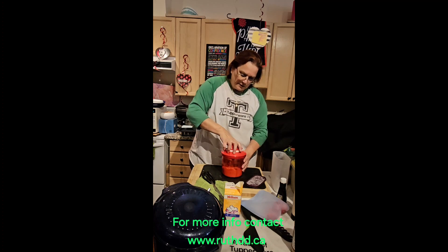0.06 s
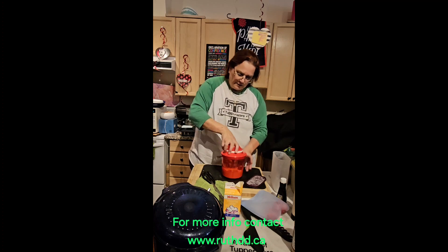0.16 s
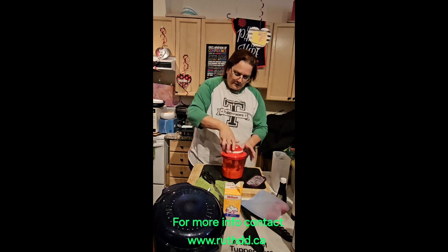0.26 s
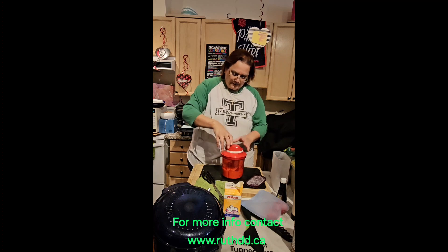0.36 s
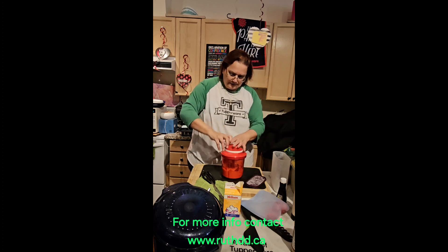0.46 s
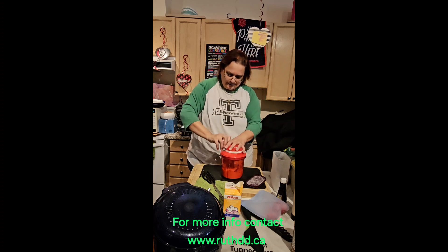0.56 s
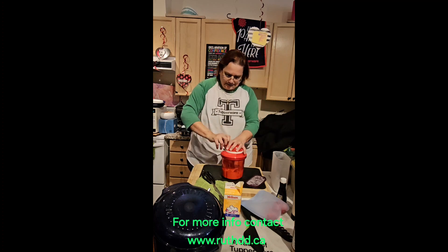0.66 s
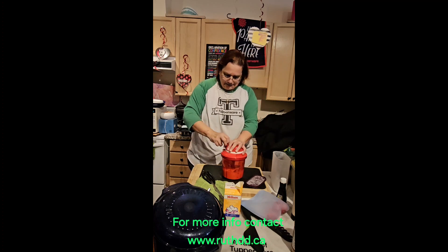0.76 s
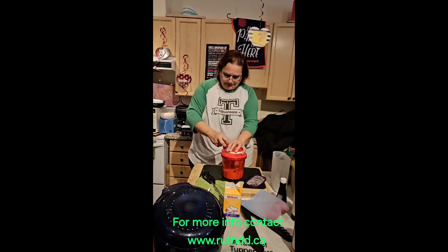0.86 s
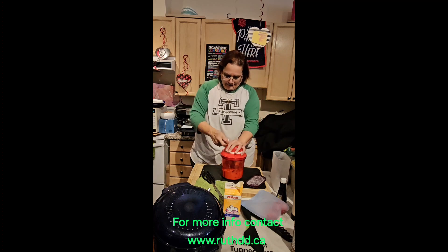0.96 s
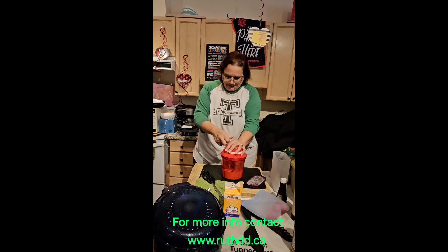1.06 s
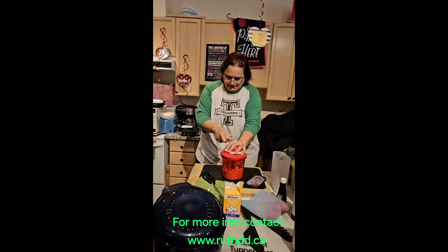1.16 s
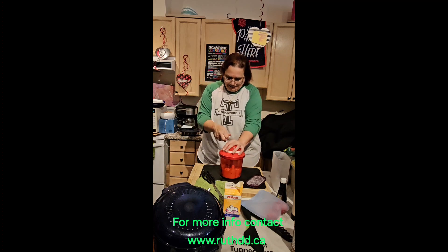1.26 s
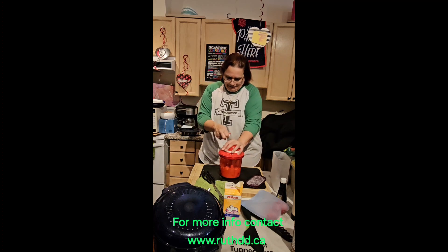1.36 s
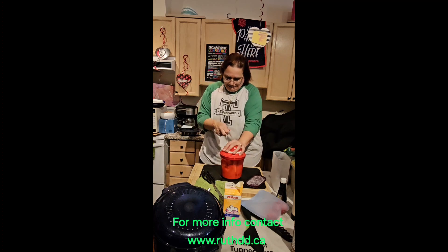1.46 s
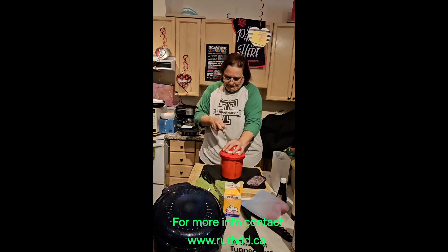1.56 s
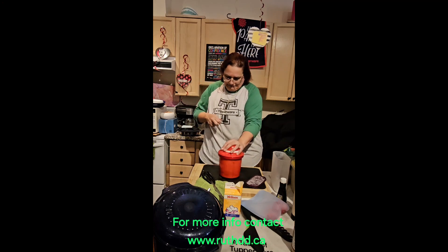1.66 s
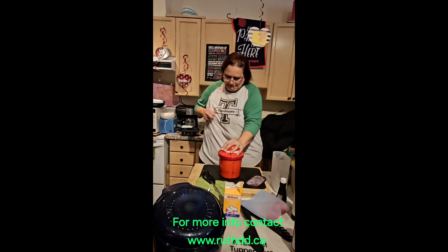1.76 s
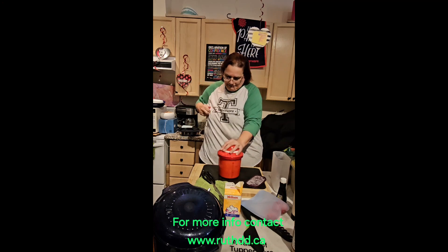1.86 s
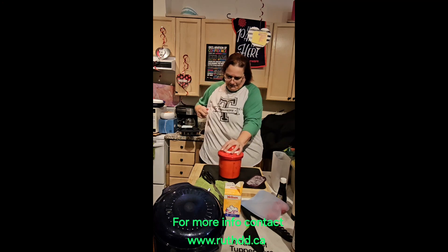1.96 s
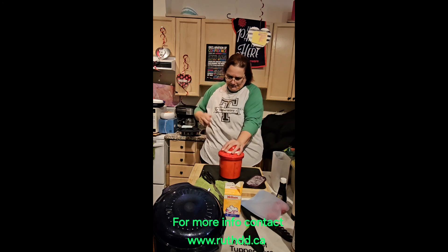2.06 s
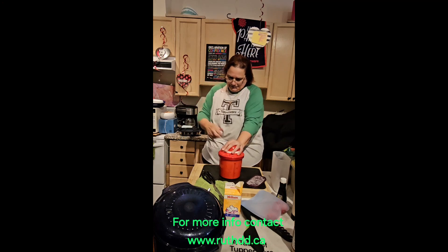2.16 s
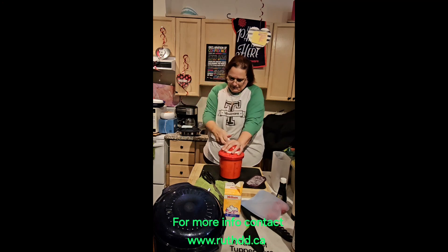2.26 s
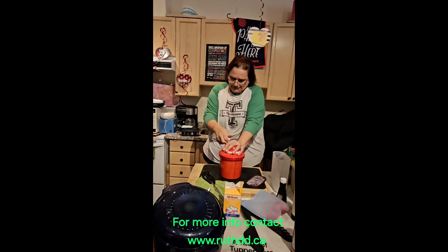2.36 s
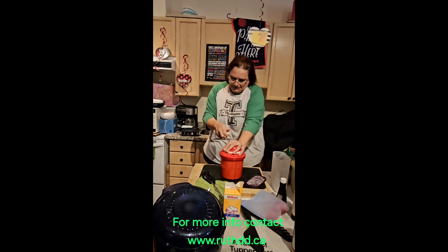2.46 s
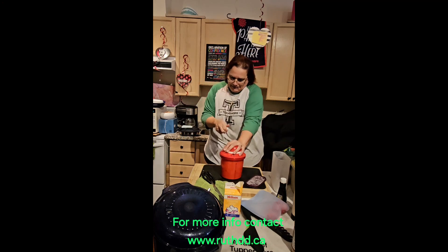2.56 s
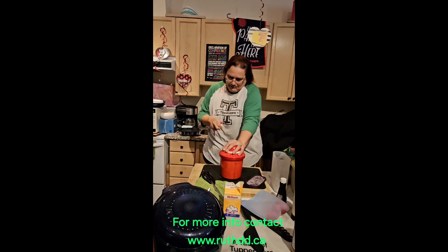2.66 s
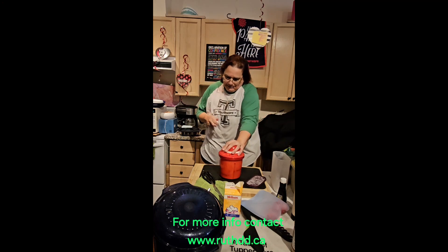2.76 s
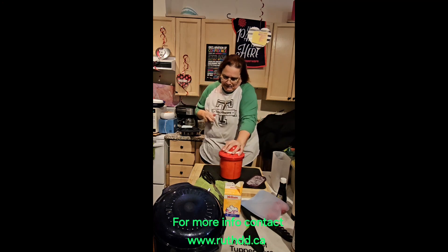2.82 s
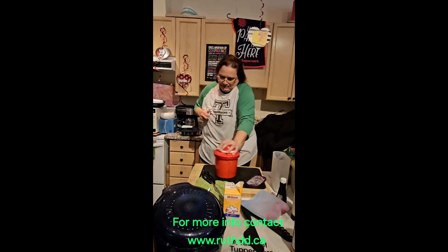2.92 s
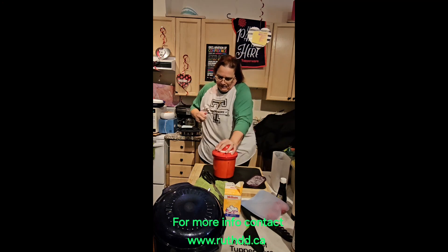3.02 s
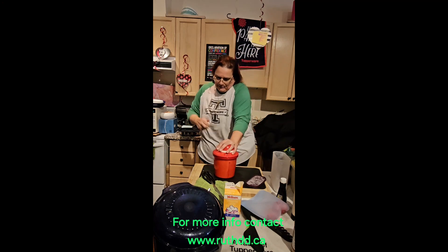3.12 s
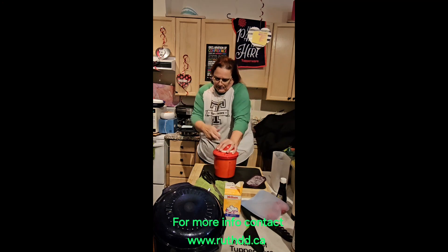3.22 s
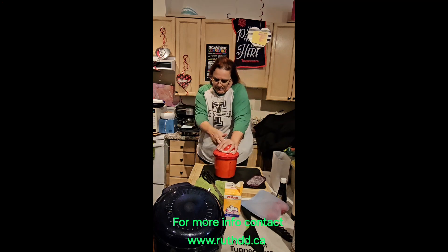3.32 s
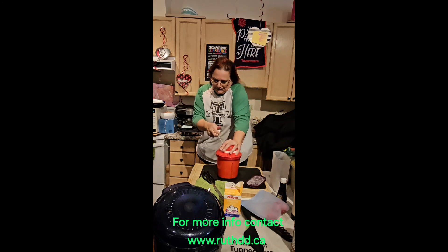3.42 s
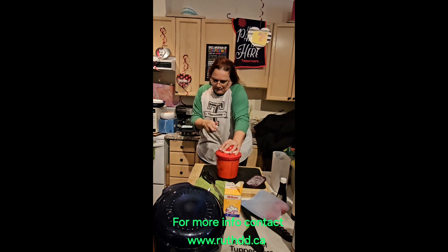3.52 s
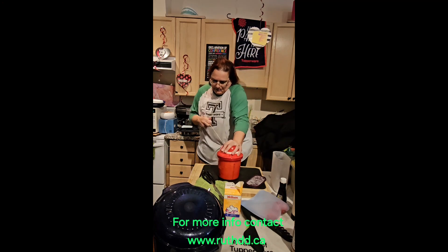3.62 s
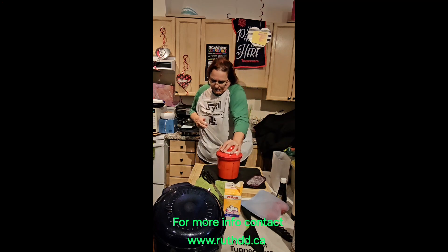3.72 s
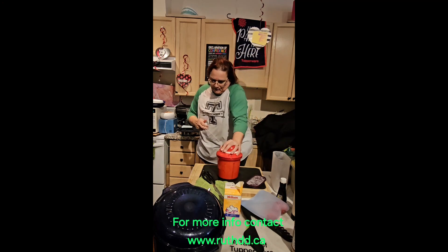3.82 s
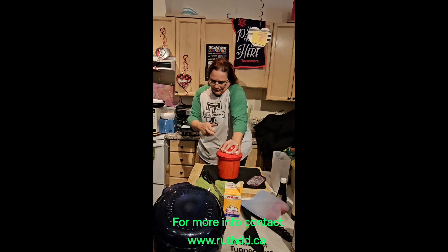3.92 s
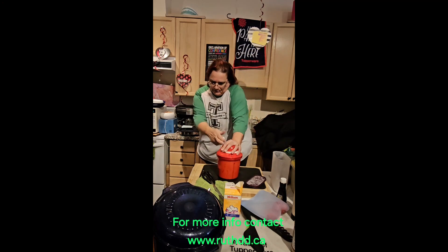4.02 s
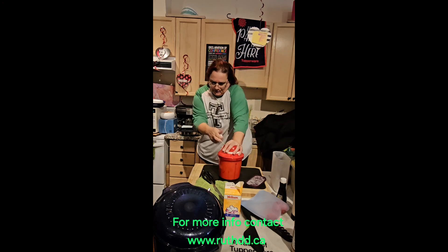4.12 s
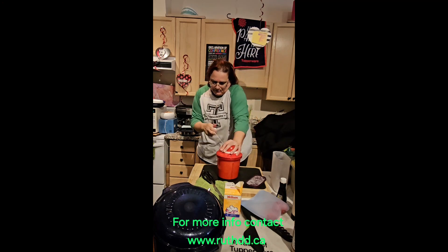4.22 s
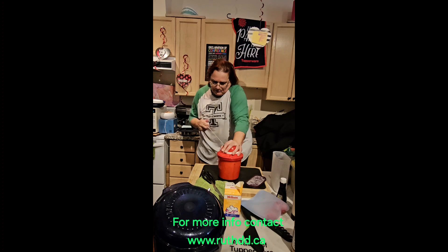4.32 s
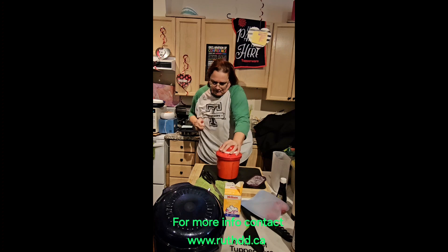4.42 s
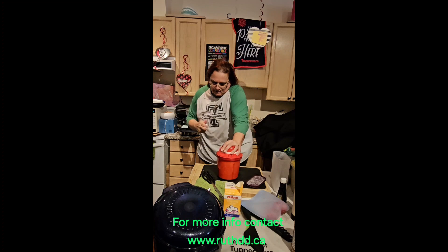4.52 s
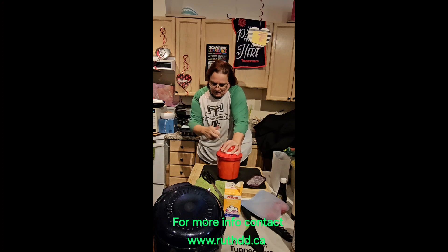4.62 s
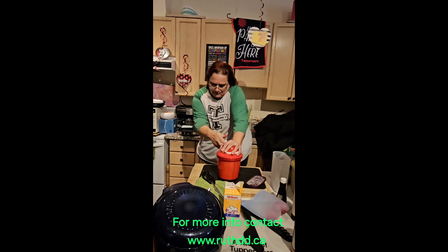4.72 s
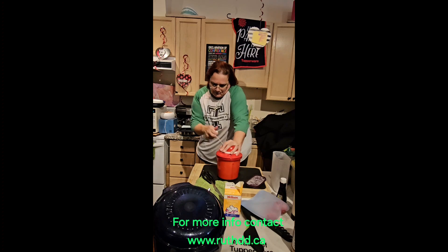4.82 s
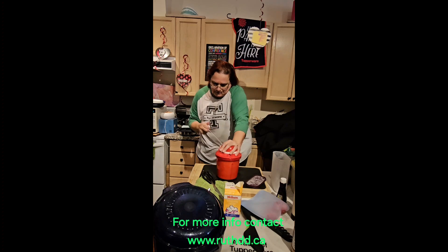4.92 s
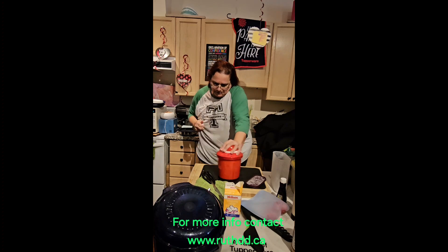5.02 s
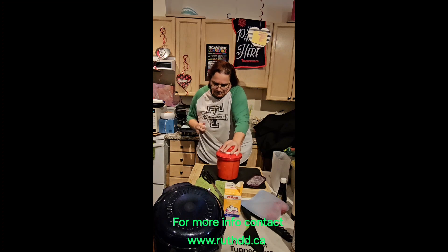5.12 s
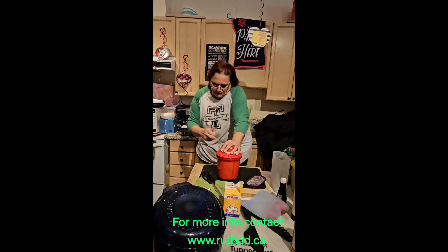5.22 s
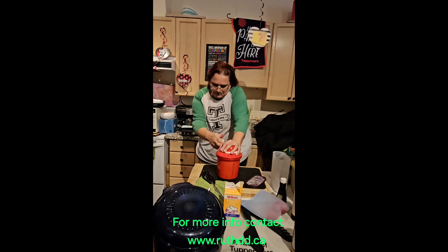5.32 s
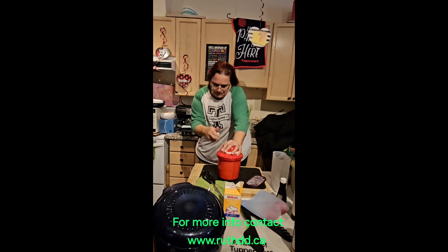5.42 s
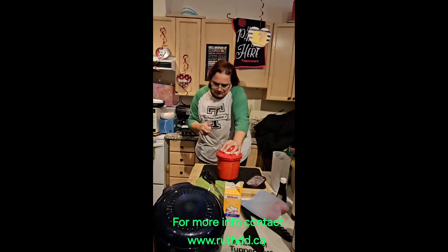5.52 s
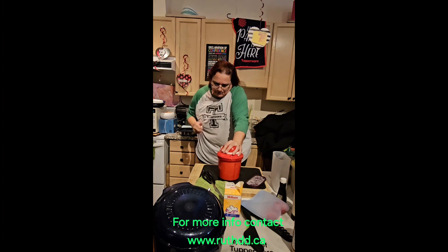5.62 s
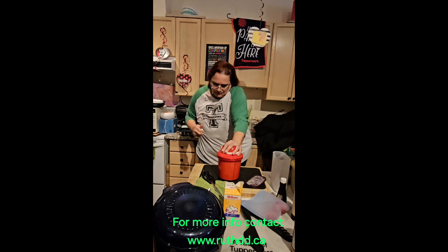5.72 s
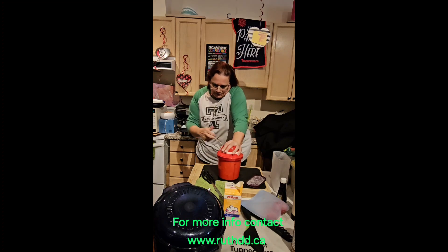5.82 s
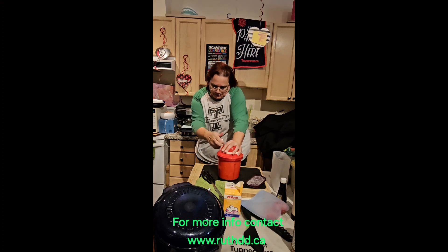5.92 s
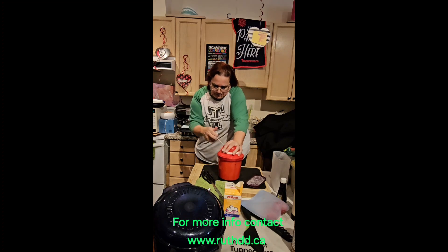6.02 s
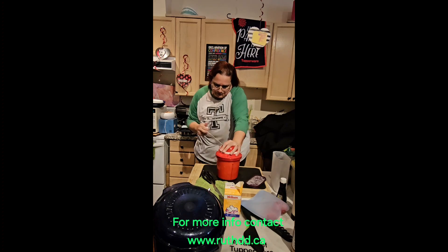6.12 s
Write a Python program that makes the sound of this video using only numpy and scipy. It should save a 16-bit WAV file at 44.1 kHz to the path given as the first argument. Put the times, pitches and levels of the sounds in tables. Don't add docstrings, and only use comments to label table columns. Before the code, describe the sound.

Quiet skin rubs and a few hollow plastic knocks come first over a fridge hum. About a second and a half in, blades start whirling through pulp, lumpy, wet and rattling, building quickly until the cord end snaps hard on its stop. The spring purrs back over its ratchet, a click, and it repeats, ever brisker, ending on a weak pull. Nearby microphone, lively little kitchen.

```python
import sys
import numpy as np
from scipy import signal
from scipy.fft import rfft, irfft, next_fast_len
from scipy.io import wavfile
from scipy.ndimage import uniform_filter1d, map_coordinates

SR = 44100
rng = np.random.default_rng(int(sys.argv[2]) if len(sys.argv) > 2 else 0)


def store_pcm(level_fs):
    pcm = np.round(np.clip(level_fs, -1, 1) * 32767).astype(np.int16)
    wavfile.write(sys.argv[1], SR, np.atleast_2d(pcm).T)


def invert_db(x):
    u = np.asarray(x, float) / 20
    return 10 ** u


N = 272538

# start/s, cord stop/s, strength/dB, extra wall rattle/dB, extra table shake/dB
PULLS = [
    (1.473, 1.97, -30, -3.5, 2.5),
    (2.537, 3.033, -33, -1, -7),
    (3.525, 3.809, -32, 0, -2),
    (4.28, 4.53, -30, 1.5, -2),
    (4.932, 5.164, -30, 2.5, 3),
    (5.553, 5.741, -32.5, 3, -13),
    (6.116, 6.3, -43, 6, 16),
]
# f/Hz, width/Hz, level/dB
BOWL = [(163, 37, -18), (258, 100, 1), (399, 85, -1), (541, 108, -0.5), (838, 110, -10)]
# f/Hz, width/Hz, level/dB
WALL = [(1074, 313, -0.5), (1435, 167, 5), (1570, 373, 1.5), (2547, 350, -2.5), (3020, 1300, -10),
        (5840, 4300, -18.5)]
# f/Hz, width/Hz, level/dB
LID = [(1078, 26, -1), (1477, 117, 1), (1645, 203, -2), (2580, 365, -2.5), (3220, 240, 1.5),
       (4060, 1180, -7), (5460, 520, -6.5), (6370, 550, -12), (7980, 1380, -14), (11640, 1230, -11.5),
       (13900, 2700, -21.5)]
# f/Hz, width/Hz, level/dB
TABLE = [(53.6, 19, -1.7), (79, 15.3, -0.15), (132.7, 29.3, -1.6)]


def unit(x):
    return x / np.sqrt(np.mean(x ** 2) + 1e-20)


def along(points, hz, column=1):
    rows = np.transpose(points)
    return np.interp(np.log(hz + 1), np.log(rows[0] + 1), rows[column])


def strokes(rows, edge_s):
    t = np.arange(N) / SR
    start, end = np.transpose(rows)[:, :, None]
    return np.clip(np.minimum(t - start, end - t) / edge_s, 0, 1) ** 2


def bumps(rows, column=2):
    t = np.arange(N) / SR
    return sum(row[column] * np.exp(-(2 * (t - row[0]) / row[1]) ** 2) for row in rows)


def wobble(rate):
    knots = rng.standard_normal(int(N * rate / SR) + 4)
    return map_coordinates(knots, [np.arange(N) * rate / SR])


def filtered(x, response):
    m = next_fast_len(N + SR // 2)
    return irfft(rfft(x, m) * response(np.fft.rfftfreq(m, 1 / SR)), m)[..., :N]


def ring(x, modes):
    def response(f):
        total = 0
        for k, (centre, width, db) in enumerate(modes):
            band = 1j * f * width
            total = total + (-1) ** k * invert_db(db) * band / (centre * centre - f * f + band)
        return total
    return filtered(x, response)


def grit(rate, spread_db, smooth):
    size = invert_db(spread_db * np.minimum(rng.exponential(size=N), 2)) * np.sign(rng.standard_normal(N))
    taps = unit((rng.random(N) < rate / SR) * size)
    return unit(taps + smooth * rng.standard_normal(N))


def chime(modes, detune):
    t = np.arange(SR // 10) / SR
    hz, db, t60 = np.transpose(modes)[:, :, None]
    pitch, size = rng.standard_normal((2, len(modes), 1))
    decay = invert_db(db + 2 * size - 60 * t / t60)
    return (decay * -np.sin(2 * np.pi * hz * (1 + detune * pitch) * t)).sum(0)


def blow(db, t60, rise_ms, crack):
    t = np.arange(SR // 5) / SR
    rebounds = invert_db(20 * uniform_filter1d(rng.standard_normal(len(t)), size=36))
    fall = invert_db(-60 * t / t60) + crack * invert_db(-60 * t / 0.018)
    rise = 1 - np.exp(-t * 1000 / rise_ms)
    burst = rebounds * rng.standard_normal(len(t)) * fall * rise
    return invert_db(db - 4.5) * burst / np.std(burst[:SR // 100])


def pulled(rule, column=None):
    level_db, climb_db, bite, jump_db, coast_db_per_s = rule
    t, gain = np.arange(N) / SR, 0
    for row in PULLS:
        start, stop, db = row[:3]
        out = np.clip((t - start) / (stop - start), 0, 1)
        climb = -climb_db * (1 - out) ** 1.01
        shape_db = np.where(t < stop, climb, jump_db - coast_db_per_s * (t - stop))
        extra_db = row[column] if column else 0
        gain = gain + np.minimum(out / bite, 1) * invert_db(db + extra_db + level_db + shape_db)
    return gain


def spin():
    start, stop = np.transpose(PULLS)[:2]
    times = np.transpose([start - .02, start, stop]).ravel()
    return np.interp(np.arange(N) / SR, times, np.tile([1, 0, 1], len(PULLS)))


def blades():
    # t/s, length/s, bowl change/dB, table change/dB
    pieces = [(.0, 0.057, 0, 20.5), (1.6, 0.053, -2, 7), (1.685, 0.047, -2, -11), (1.75, 0.038, 4.5, 0),
              (1.93, 0.032, -2, -8), (2.91, 0.044, -5, -4), (3.96, 0.029, 9, 15), (4.82, .08, 3, 10),
              (0.63, 0.053, 0, -1), (1.89, 0.094, 8, 6.5), (2.17, 0.12, 7, 11), (2.68, 0.054, -1, 11),
              (2.86, 0.1, 4, 14), (3.08, 0.13, 8.5, 16), (3.74, 0.19, 4, 15.5), (4.39, 0.1, 1, 6.5),
              (4.58, 0.029, -5, 11), (5.04, 0.088, 2, 3), (5.61, 0.19, -1.5, 7), (5.68, 0.048, 4, 4),
              (5.82, 0.038, -11, 18), (1.25, 0.085, 0, 5), (5.23, 0.061, -2, -7)]
    # level over strength/dB, climb to stop/dB, bite/share of pull, jump at stop/dB, coasting loss/(dB/s)
    churn = (-2.5, 3.5, 0.22, -2.5, 100)
    rattle = (-9.5, 10.5, 0.39, -3.5, 129)
    spray = (-9, 18, 0.7, 0, 136)
    gears = (-11, 7.5, 0.38, 5, 169)
    rock = (-9, 1, .3, -5, 75)
    # f/Hz, level/(dB per Hz)
    hiss_spectrum = [(1470, -25), (2500, -1), (4450, -8), (6090, -12), (12300, -12.5), (15000, -17),
                     (15600, -36), (16500, -71)]

    load_db = bumps(pieces)
    lumps = invert_db(1.1 * wobble(35) + 1.7 * wobble(95))
    pulp = lumps * grit(220, spread_db=3.5, smooth=1.1)
    slaps = filtered(pulp, lambda f: 1 / (1 + 1j * f / 1200))
    taps = 2.16 * slaps + lumps * grit(600, spread_db=6, smooth=0.8)

    slow = ring(taps, np.array(WALL[:3]) * [0.854, 1, 1])
    fast = ring(taps, np.array(WALL[:3]) * [1.066, 1, 1])
    speed = spin()
    low = np.sqrt(1 - speed) * slow + np.sqrt(speed) * fast
    high = ring(taps, WALL[3:])
    wall = (pulled(rattle, column=3) * low - pulled(spray, column=3) * high) / np.std(low)

    mesh = np.sqrt(lumps) * grit(4900, spread_db=-4.0, smooth=4.1)
    hiss = unit(filtered(mesh, lambda f: invert_db(along(hiss_spectrum, f))))
    bowl = invert_db(load_db + 1.5) * pulled(churn) * unit(ring(slaps, BOWL))
    bowl = bowl + invert_db(0.75 * load_db + 6.0) * wall
    bowl = bowl + invert_db(0.39 * load_db - 3.0) * pulled(gears) * hiss

    sway = invert_db(1.5 * wobble(21.74)) * pulled(rock, column=4)
    idle = invert_db(-53 + 2.5 * wobble(11))
    shake = invert_db(bumps(pieces, column=3)) * (sway + idle)
    return bowl + shake * unit(ring(ring(slaps, TABLE), TABLE))


def cuts():
    # t/s, peak/dB, wall edge/dB
    slices = [(1.508, -29, -2), (1.648, -29, -7), (1.662, -25, -4), (1.703, -19, -1), (1.742, -20.5, -2),
              (1.754, -16, -4), (1.841, -31, -3), (1.864, -16.5, 1.5), (1.881, -15.5, 0), (2.595, -29, -6),
              (2.608, -27, -8), (2.64, -33, -7), (2.675, -23, -5), (2.716, -21.5, -3), (2.758, -17.5, -5),
              (2.783, -33, -1), (2.804, -24, -0.5), (2.839, -19, -2), (2.87, -18, -7), (2.901, -28, -3),
              (2.925, -17, -1), (3.001, -18, -8), (3.551, -25, -3), (3.584, -24, -4), (3.612, -25, -3),
              (3.636, -27, -9), (3.658, -21, -2), (3.692, -18, -4), (3.705, -17, -4), (3.741, -16, -3),
              (3.766, -12, -7), (4.309, -24, -2), (4.347, -21, -6), (4.385, -16, -1), (4.408, -18, -6),
              (4.433, -17, -3), (4.458, -13.5, -1), (4.492, -21, -4), (4.584, -17, -7), (4.979, -28, 3),
              (5.011, -18.5, -3), (5.044, -16, -3), (5.068, -22, 7), (5.108, -23, -3), (5.602, -25, -4),
              (5.624, -23, 0.5), (5.653, -18, -5), (5.719, -21.5, 0), (5.741, -21.5, 0)]
    # f/Hz, level/dB, t60/s
    bowl_modes = [(252, -5, .045), (560, -1.5, .045), (767, -5, .035)]
    # f/Hz, level/dB, t60/s
    wall_modes = [(1150, -1, .03), (1450, -1, .03), (1800, -4, 0.017), (2600, -4, .02), (3600, -11, 0.0066)]
    out = np.zeros(N + SR)
    for s, db, edge_db in slices:
        note = chime(bowl_modes, detune=0.052) + invert_db(edge_db) * chime(wall_modes, detune=0.052)
        out[round(s * SR):][:SR // 10] += invert_db(db - 9) * note
    return out[:N]


def clacks():
    # t/s, peak/dB, bowl note/dB, t60/s, extra wall/dB
    stops = [
        (1.9718, -6, -7.5, 0.014, -1),
        (3.027, -10.5, -8.5, 0.053, 3.5),
        (3.8126, -5.5, -10, 0.1, 2.5),
        (4.5183, -9.5, -13, 0.085, -3),
        (5.1544, -9, -4.5, 0.022, 3),
        (5.7799, -13.5, -5.5, 0.018, 2),
    ]
    # t/s, peak/dB, bowl note/dB, t60/s
    releases = [
        (1.5137, -41.5, 4.5, 0.39),
        (3.2438, -31.5, -4, 0.05),
        (4.6702, -29, -8, 0.14),
        (5.9, -40, -12, 0.11),
    ]
    # t/s, peak/dB, bowl note/dB, t60/s, extra wall/dB (optional)
    clutch = [
        (2.5308, -23, -6, 0.033),
        (3.5138, -21.5, 2, 0.055),
        (4.256, -27, 3, 0.052),
        (4.9188, -18, -5, 0.035, -3),
        (5.5436, -20, 2.5, 0.019),
        (6.135, -20.5, 2, 0.0077),
    ]
    # t/s, peak/dB, bowl note/dB, t60/s
    pawls = [
        (2.1001, -26, -1.5, 0.036),
        (2.151, -30.5, -4, 0.13),
        (3.2131, -33, -10, 0.049),
        (3.953, -30.5, 4, 0.1),
        (5.468, -34, -15, 0.046),
    ]
    # f/Hz, width/Hz, level/dB
    note = [(548, 64, 3.5), (687, 153, -3)]
    # f/Hz, width/Hz, level/dB
    snap = [(2440, 540, -12.5), (3180, 550, 3.5), (4530, 980, 1.5), (5440, 830, 2.5), (6480, 370, -38)]
    # delay/s, level/dB
    rebounds = [
        (-.004, -16),
        (.007, -6),
        (.016, -7.5),
        (0.031, -18),
    ]

    again = []
    for s, db, note_db, t60, wall_db in stops:
        for later, change_db in rebounds:
            again.append((s + later, db + change_db, note_db - 4.5, t60, wall_db))
    # rows, wall/dB, sizzle/dB, rise/ms, first crack
    kinds = [(stops + again, -12.5, -15, 2, 6.8),
             (releases, 0.5, -14.5, 10, 1),
             (clutch, -5.5, -15, 0.05, -0.5),
             (pawls, -6, -22, 3.5, -0.1)]
    drive = np.zeros((4, N + SR))
    for rows, wall_db, sizzle_db, rise_ms, crack in kinds:
        for s, db, note_db, t60, *more_db in rows:
            share_db = [[note_db + 14], [wall_db + sum(more_db) + 10.0], [-2.5], [sizzle_db + 19]]
            hit = invert_db(share_db) * blow(db, t60, rise_ms, crack)
            drive[:, round(s * SR):][:, :SR // 5] += hit
    bodies = (note, WALL[:4], snap, LID[8:])
    return sum(ring(part[:N], modes) for part, modes in zip(drive, bodies))


def cracks():
    # t/s, peak/dB, wall note f/Hz, note/dB
    contacts = [
        (1.9743, -10, 1150, 4),
        (1.983, -15, 1086, 6),
        (3.030, -12, 2040, -3),
        (3.814, -7, 2290, -9),
        (3.822, -9, 830, -10),
        (4.521, -10, 930, -6),
        (4.537, -14, 1800, -1),
        (5.156, -16.5, 1660, -2),
        (5.166, -17, 560, 2),
        (5.78, -15, 1500, -6),
    ]
    # f/Hz, level/dB, t60/s
    edge = [(3200, -2, .016), (3750, -3, .012), (5350, -2, .012), (7500, -9, .005), (11800, -6, .006)]
    out = np.zeros(N + SR)
    for s, db, hz, note_db in contacts:
        out[round(s * SR):][:SR // 10] += invert_db(db - 8.5) * chime([(hz, note_db, .05)] + edge, detune=0.033)
    return out[:N]


def ratchet():
    # start/s, end/s, strength/dB, second push/s, its swell/dB
    rewinds = [
        (2.169, 2.453, -37.5, 2.4, -3),
        (3.221, 3.481, -36.5, 3.41, 2),
        (3.967, 4.245, -37.5, 4.12, 3.5),
        (4.643, 4.891, -36.5, 4.85, 0),
        (5.282, 5.522, -35, 5.46, 3.5),
        (5.877, 6.123, -35, 6.06, -4),
    ]
    # f/Hz, width/Hz, level/dB
    base = [(258, 46, 8.3), (597, 105, 5.4), (874, 240, 1.75)]
    t, whirr, rumble = np.arange(N) / SR, 0, 0
    for start, end, db, push_s, push_db in rewinds:
        run_out_s, sag_db_per_s = 0.083, 31
        run_out = np.clip(1 - (end - t) / run_out_s, 0, 2) ** 2
        push = bumps([(push_s, 0.026, push_db)])
        level_db = db - sag_db_per_s * (t - start) - 14 * run_out + push
        gain = strokes([(start, end + run_out_s)], edge_s=0.036)[0] * invert_db(level_db)
        whirr = whirr + gain
        rumble = rumble + gain * invert_db(-3 + 6.5 * run_out)

    teeth_hz = 280 * invert_db(1.5 * wobble(60))
    teeth = np.diff(np.floor(np.cumsum(teeth_hz) / SR), prepend=0)
    decay = invert_db(-60 * np.arange(400) / SR / 0.0068)
    skips = signal.fftconvolve(teeth * invert_db(4 * rng.standard_normal(N)), decay)[:N]
    scrape = 0.98 * grit(2500, spread_db=2.5, smooth=0.99)
    drive = invert_db(.8 * wobble(30)) * (unit(skips * rng.standard_normal(N)) + scrape)
    return invert_db(6.0) * (whirr * unit(ring(drive, LID)) + rumble * unit(ring(drive, base)))


def jolts():
    # t/s, peak/dB, pitch/Hz, edge/dB
    lurches = [(1.581, -16.5, 120, -8), (1.71, -17, 214, -6), (1.743, -24, 635, -14),
               (1.808, -25.5, 258, 6), (1.882, -8, 312, -2), (1.943, -12.5, 148, 1.5),
               (2.716, -31, 590, 9.5), (2.758, -15.5, 510, -12), (2.814, -21.5, 493, 1),
               (2.926, -25, 338, 6), (2.949, -17.5, 266, 0), (3.003, -24, 254, 7.5), (3.07, -19, 97, 5.5),
               (3.58, -45, 590, -20), (3.662, -27, 153, -4), (4.302, -24, 194, -21), (4.347, -40, 550, -22),
               (4.386, -18, 138, 4), (4.583, -16, 265, -3), (4.985, -34, 280, -11), (5.045, -33, 600, 15),
               (5.223, -9, 130, -1.5), (5.622, -19.5, 560, -13)]
    push, shake, edge = np.zeros((3, N + SR))
    t = np.arange(SR // 8) / SR
    for s, db, hz, edge_db in lurches:
        at = slice(round(s * SR), round(s * SR) + len(t))
        burst = rng.standard_normal(len(t)) * invert_db(db + 1.5 - 60 * t / 0.045)
        burst[:3] = 4 * invert_db(db)
        rise = 1 - np.exp(-t / 0.0026)
        push[at] += invert_db(db + 0.5 - 60 * t / 0.042) * np.sin(2 * np.pi * hz * t) * rise
        shake[at] += burst
        edge[at] += invert_db(edge_db) * burst
    body = invert_db(8.0) * ring(shake[:N], TABLE + BOWL) + ring(edge[:N], WALL)
    return push[:N] + filtered(body, lambda f: 1 / (1 + 1j * f / 4000) ** 2)


def handle():
    # t/s, peak/dB, sizzle/dB, t60/s
    touches = [(0.2668, -50, -23, 0.04), (0.3375, -39, -28, 0.036), (0.4668, -31, -26, 0.054),
               (0.597, -40, -25, 0.23), (0.6647, -23, -19, 0.012), (0.612, -41, -24, 0.1),
               (0.63, -41, -24, 0.1), (0.682, -38, -22, 0.12), (0.72, -45, -22, 0.1),
               (0.762, -41, -22, 0.05), (1.3443, -41, -19, 0.03)]
    # f/Hz, width/Hz, level/dB
    grip = [(1130, 88, -8), (1340, 110, -1), (1780, 200, 4.5), (2260, 290, 0.5), (3040, 810, -10),
            (4750, 1700, -11)]
    # f/Hz, width/Hz, level/dB
    lid_under = [(230, 140, -1), (600, 320, -6), (6400, 6500, -19)]
    drive = np.zeros((2, N + SR))
    for s, db, sizzle_db, t60 in touches:
        hit = invert_db([[0], [sizzle_db]]) * blow(db - 0.5, t60, rise_ms=0.11, crack=1.1)
        drive[:, round(s * SR):][:, :SR // 5] += hit
    return invert_db(1.5) * ring(drive[0, :N], grip + lid_under) + invert_db(4.0) * ring(drive[1, :N], LID[7:])


def grip_chimes():
    # t/s, peak/dB
    firm_knocks = [
        (0.469, -44),
        (0.665, -34),
    ]
    # f/Hz, level/dB, t60/s
    grip_modes = [
        [(1340, -8, .04), (1740, -1, .07), (2150, -4, .04), (3650, -12, .05)],
        [(1615, -9, .06), (1800, -1, .05), (1994, -2, .08), (2350, -4.5, .04), (3250, -6, .03), (4150, -5, .04)],
    ]
    out = np.zeros(N + SR)
    for (s, db), modes in zip(firm_knocks, grip_modes):
        out[round(s * SR):][:SR // 10] += invert_db(db) * chime(modes, detune=0)
    return out[:N]


def hand():
    # start/s, length/s, drag/dB, brush/dB
    rubs = [
        (-.04, .08, -56, -67),
        (0.043, 0.27, -91, -78),
        (0.226, 0.15, -62.5, -76),
        (0.602, 0.11, -60, -67),
        (.68, 0.13, -61, -80),
        (0.858, 0.28, -84, -76),
        (1.014, 0.15, -64.5, -70),
        (1.139, 0.18, -64.5, -73),
        (1.282, .11, -61.5, -70),
        (1.387, 0.079, -57.5, -75),
    ]
    # start/s, length/s, first f/Hz, last f/Hz, level/dB
    squeaks = [
        (.09, .1, 5650, 6500, -73),
        (.09, .12, 11200, 12700, -74),
        (.07, .09, 13500, 15200, -70),
        (.17, .07, 7500, 8500, -74),
        (.22, .1, 7900, 7600, -77),
        (-.08, .4, 10200, 9900, -78),
        (.03, .13, 11600, 11300, -78),
        (.14, .16, 15300, 15300, -77),
    ]
    # f/Hz, level/(dB per Hz)
    drag_spectrum = [(700, -120), (900, 4), (1800, -1), (2500, -3.5), (4500, -12), (7000, -32),
                     (9000, -120)]
    # f/Hz, level/(dB per Hz)
    brush_spectrum = [(2500, -120), (3500, -6), (5000, 0), (9000, -5.5), (12000, -4), (15000, -9),
                      (16500, -30)]
    t = np.arange(N) / SR
    gates = strokes([(s, s + length) for s, length, *_ in rubs], edge_s=0.03)
    rustle, sweep = invert_db(np.array(rubs)[:, 2:].T) @ gates
    skin = grit(1000, spread_db=6.0, smooth=0.73)
    sleeve = grit(2500, spread_db=-5.0, smooth=1.5)
    rub = invert_db(2.5 * wobble(41)) * np.array([skin, sleeve])
    drag, brush = filtered(rub, lambda f: invert_db([along(drag_spectrum, f), along(brush_spectrum, f)]))
    restless = invert_db(-81) * (t < PULLS[0][0])
    out = rustle * unit(drag) + (sweep + restless) * unit(brush)
    for s, length, first_hz, last_hz, db in squeaks:
        u = np.clip((t - s) / length, 0, 1)
        hz = (first_hz + (last_hz - first_hz) * u) * (1 + 0.0044 * wobble(144))
        tone = np.sin(2 * np.pi * np.cumsum(hz) / SR)
        out = out + invert_db(db + 2.7 * wobble(63)) * np.sin(np.pi * u) * tone
    return out


def kitchen(x):
    # f/Hz, t60/s
    decay_times = [(100, 0.67), (600, 0.13), (3000, 0.25), (12000, 0.17)]
    # f/Hz, shared level/dB, left-right level/dB
    wet = [(95, -5.5, -15.5), (285, -9, -17), (804, -2.5, 1.5), (2180, -2, -1.5), (5670, -2, 1.5),
           (12800, -1, 2.5)]
    echo, step = np.zeros((2, N + SR)), SR // 8
    padded = np.pad(x, (step, 2 * step))
    for start in range(-step, N, step):
        hz, t, z = signal.stft(rng.standard_normal((2, SR // 3)), SR, nperseg=256)
        fall = invert_db(-60 * t / along(decay_times, hz)[:, None])
        tail = signal.istft(z * fall, SR, nperseg=256)[1]
        piece = padded[start + step:][:2 * step] * np.hanning(2 * step)
        piece = piece[max(-start, 0):]
        answer = signal.fftconvolve(piece[None], tail / np.linalg.norm(tail[0]), axes=1)
        echo[:, max(start, 0) + 60:][:, :answer.shape[1]] += answer
    shared, apart = filtered(echo[:, :N], lambda f: invert_db(np.array([along(wet, f), along(wet, f, column=2)])))
    return np.array([x + shared + apart, x + shared - apart])


def fridge():
    # f/Hz, level/(dB per Hz)
    air_spectrum = [(15, -33), (25, 0), (181, -2.5), (258, 4.5), (433, -6.5), (668, -5), (1000, -16),
                    (1150, -14), (2530, -25), (4350, -28.5), (6720, -34.5), (12200, -36), (14800, -36),
                    (16500, -72)]
    # f/Hz, correlation/1
    alike = [(60, 0.88), (240, 0.94), (950, 0.19), (3770, -0.37), (15000, -0.4)]
    # f/Hz, level/dB
    hum = [(59.2, -88), (118.4, -61), (177.6, -61), (242.2, -58.5), (597.5, -71), (672.9, -68)]

    def mid_side(f):
        turn = np.arccos(np.clip(along(alike, f), -1, 1)) / 2
        return invert_db(along(air_spectrum, f)) * [np.cos(turn), np.sin(turn)]

    mid, side = filtered(rng.standard_normal((2, N)), mid_side)
    out = invert_db(-49.5) * invert_db(.8 * wobble(6)) * unit(np.array([mid + side, mid - side]))
    t = np.arange(N) / SR
    for hz, db in hum:
        swell = invert_db(db + 3.5 * wobble(7.7))
        out = out + swell * np.sin(2 * np.pi * hz * t + 0.19 * wobble(11.0))
    return out


def scene():
    chopper = blades() + cuts() + clacks() + cracks() + ratchet() + jolts()
    hands = handle() + grip_chimes() + hand()
    return invert_db(0.5) * kitchen(chopper + hands) + fridge()


def top_cut(x):
    return signal.sosfilt(signal.butter(12, 16610, fs=SR, output="sos"), x)


def record(dry):
    # f/Hz, level/dB
    mic = [(20, -12), (40, -4), (80, 0), (15350, 0), (15500, -14), (16500, -18), (16650, -120)]
    heard = filtered(dry, lambda f: invert_db(along(mic, f)))
    return top_cut(heard)


dry = scene()
out = record(dry)
store_pcm(out)
```